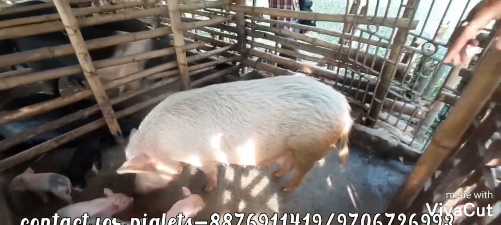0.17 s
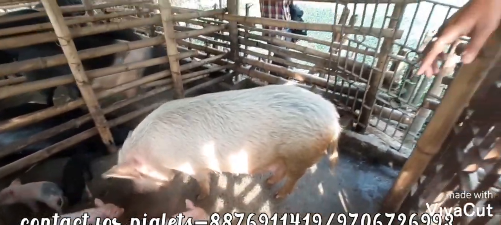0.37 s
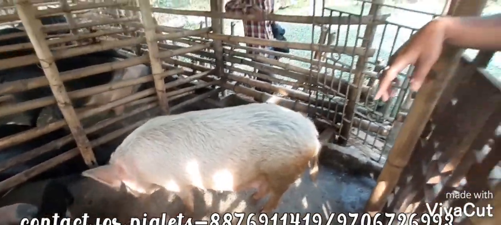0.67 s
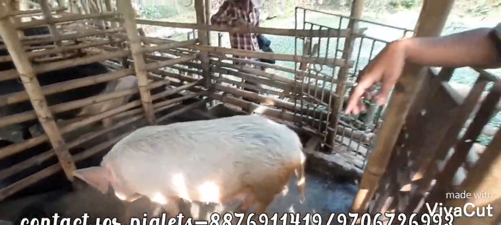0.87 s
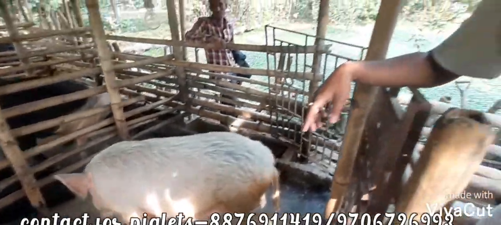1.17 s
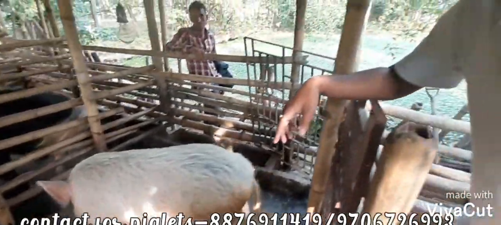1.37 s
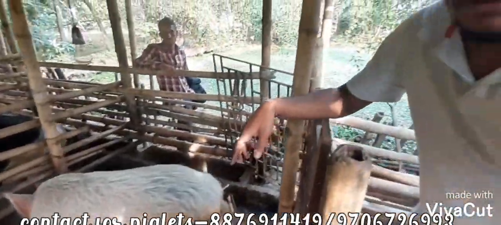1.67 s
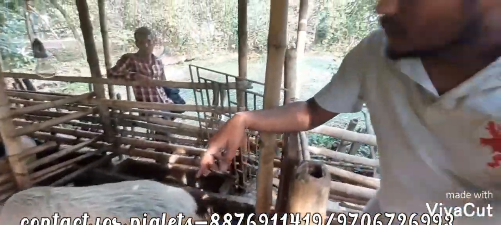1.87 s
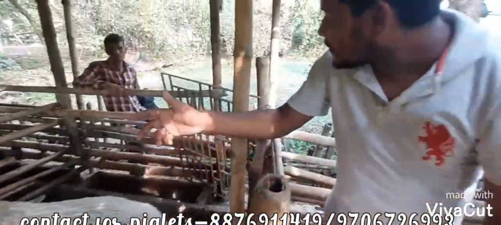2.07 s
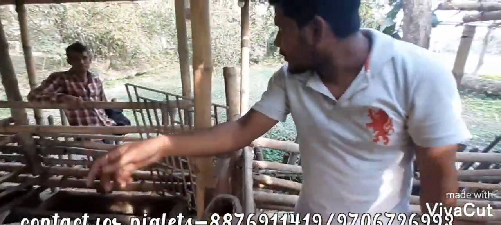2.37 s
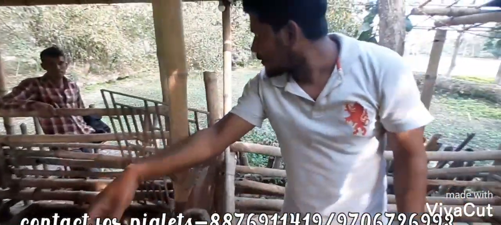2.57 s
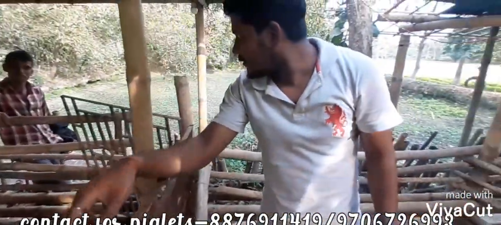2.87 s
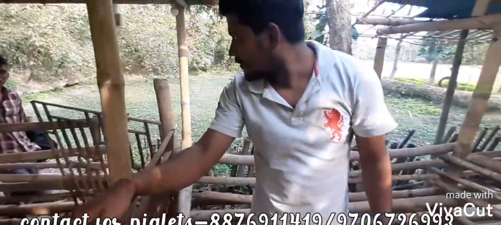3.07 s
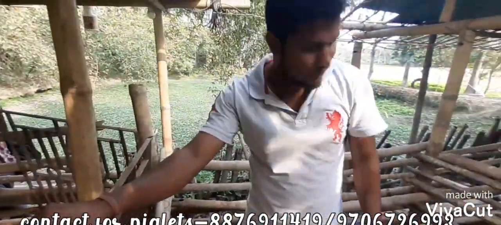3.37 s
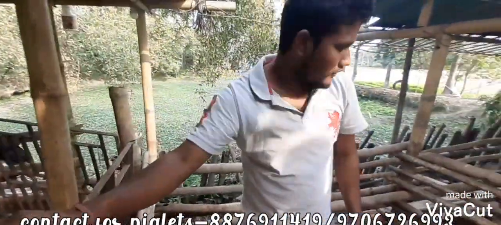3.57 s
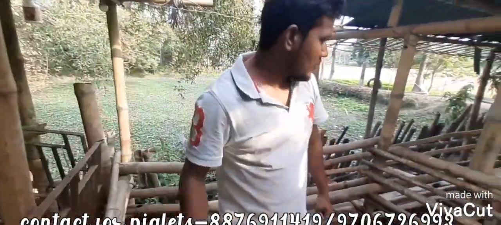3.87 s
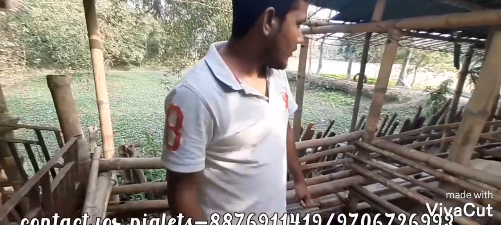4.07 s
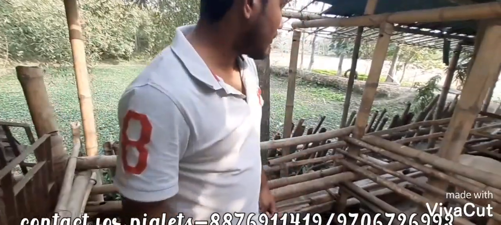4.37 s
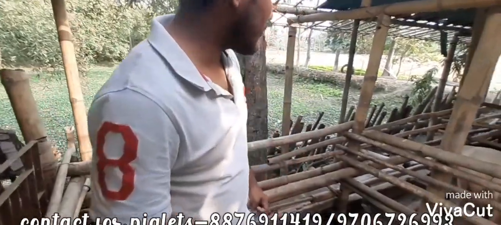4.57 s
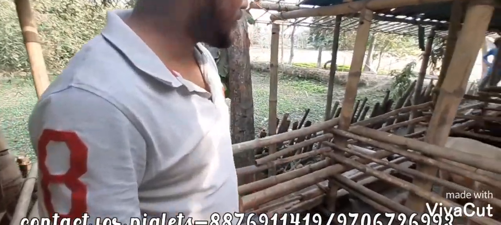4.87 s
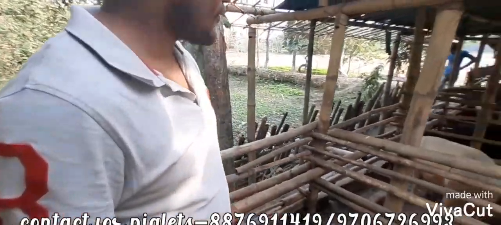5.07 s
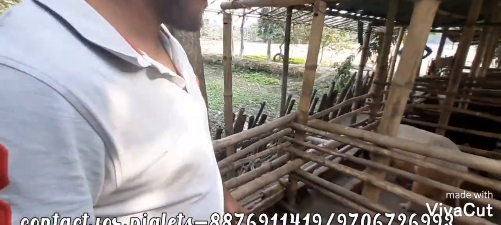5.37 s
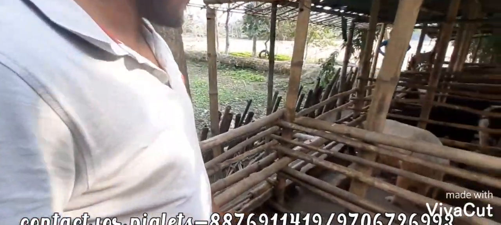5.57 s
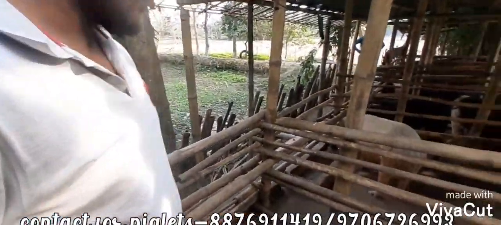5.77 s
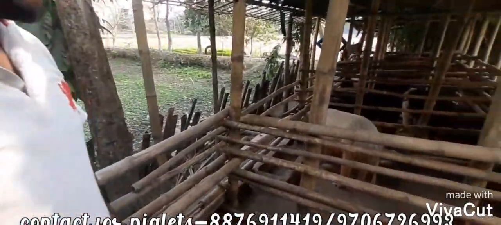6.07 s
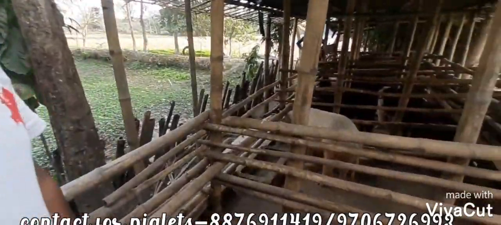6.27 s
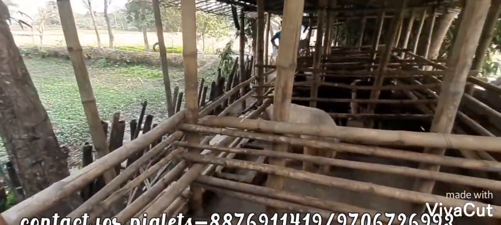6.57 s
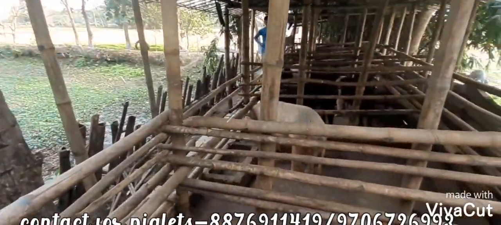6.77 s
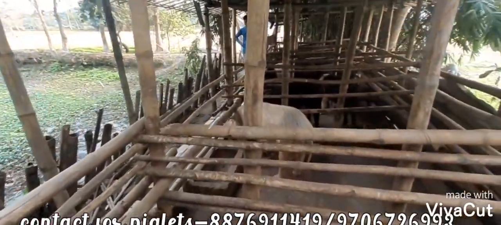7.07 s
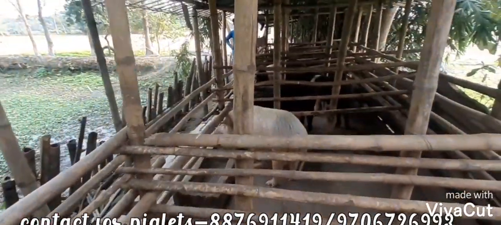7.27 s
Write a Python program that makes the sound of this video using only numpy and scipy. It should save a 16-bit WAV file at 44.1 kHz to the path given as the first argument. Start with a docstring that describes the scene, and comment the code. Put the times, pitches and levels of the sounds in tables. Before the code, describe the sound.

Pigs grunt and snort close by in short irregular runs, with small squeaky oinks early, bird whistles and a distant engine humming then dying away.

```python
"""Bamboo pens under an open roof: pigs grunt, snort, snuffle and oink close to two turning microphones.
A grunt is a short run of slow soft-palate flaps: weak ones thump in the throat, strong ones snap and ring
the snout. Snuffles are fluttering turbulent air; oinks are voiced harmonics shaped by throat and nose.
Small birds whistle gliding tones in the trees around, and a far engine hums as low lines, then winds down.
Outdoor noise lies beneath; knocks are dying scrapes, and brushing clothing is hiss over a low rub."""
import sys
import numpy as np
from scipy import signal
from scipy.fft import rfft, irfft
from scipy.io import wavfile
from scipy.ndimage import uniform_filter1d, map_coordinates

SR = 44100
rng = np.random.default_rng(int(sys.argv[2]) if len(sys.argv) > 2 else 0)


def output_pcm(signal):
    """Save a mono or channel-first signal as 16-bit PCM at the path in sys.argv[1].

    Samples are clipped to [-1, 1] before scaling.
    """
    pcm = np.clip(np.atleast_2d(signal).T, -1, 1) * 32767
    wavfile.write(sys.argv[1], SR, np.round(pcm).astype(np.int16))


N = 327663

TIME = np.arange(N) / SR
FLAP_TIME = np.arange(SR // 14) / SR

# outdoor noise spectrum before normalisation: f/Hz, level per Hz/dB
YARD_SPECTRUM = [(30, 0), (80, 11.5), (270, -5), (2000, -5.5), (4200, -11), (7000, -20), (9000, -14),
                 (15000, -21.5)]
# course of its treble before the overall gain: t/s, level/dB
YARD_TREBLE = [(0.0, -62), (1.59, -62), (2.15, -63.5), (3.37, -66.5), (3.85, -62), (4.3, -64), (5.3, -58.5),
               (5.79, -69.5), (6.31, -62), (7.43, -59.5)]
# engine lines: multiple of the firing rate, level before the fade/dB
ENGINE_LINES = [(2, -56.5), (3, -57.5), (4, -54.5)]
# firing rate before winding down/Hz, start of winding down/s, then its slowing and fading
ENGINE_HZ, ENGINE_STOP_S, ENGINE_SLOWS_OCTAVES_PER_S, ENGINE_FADE_DB_PER_S = 28.2, 3.1, 0.29, 9

# voiced calls: peak t/s, rise/s, fall/s, level/dB, peak f/Hz, fundamental level over the throat/dB,
# pitch jitter/share
OINKS = [(0.172, .02, 0.032, -32.5, 148, -7, .06), (0.51, .025, 0.058, -36.5, 228.8, 1, .09),
         (1.014, .011, .02, -35.5, 172, -13, .03), (2.897, .036, .036, -37.5, 202.6, -3, 0.039)]

# notes of one bird's phrase: t into the phrase/s, length/s, start f/Hz, end f/Hz, level over the phrase/dB
PHRASE_NOTES = [(0, 0.11, 5380, 5060, -5), (.283, 0.077, 3700, 3830, 3.5), (.41, 0.221, 4490, 4340, 2),
                (0.658, 0.21, 2954, 2755, -6.5)]
# its repeats: t/s, level before distance/dB
PHRASE_STARTS = [(0.206, -53), (4.385, -55.5), (6.142, -54)]
# falling slurs: t/s, f from which the shape is scaled/Hz, level before distance/dB
SLURS = [(1.12, 4470, -53.5), (2.16, 4380, -54), (2.52, 4590, -54.5), (3.32, 4450, -53.5),
         (6.745, 4950, -47.5), (7.09, 4250, -50.5)]
SLUR_S, SLUR_SHAPE = 0.11, (0.99, .96, .84, .79)  # length/s; pitches/share of the table f
# arched chirps: t/s, top f/Hz, level before distance/dB
CHIRPS = [(2.095, 3280, -59), (6.344, 4110, -54), (6.924, 4150, -46.5), (7.338, 4124, -44)]
CHIRP_S, CHIRP_START, CHIRP_END = 0.077, .76, .83  # length/s; end pitches/share of the top
# rising sweeps: t/s, level before distance/dB
SWEEPS = [(6.53, -52.5), (7.101, -45)]
SWEEP_S, SWEEP_HZ = .1, (4450, 5080, 6850, 6720)  # length/s; pitches passed through/Hz

# spectrum of blown air: f/Hz, level per Hz/dB
AIR_SPECTRUM = [(60, -6), (200, 14.5), (330, 11.5), (470, 2.5), (700, -2), (2200, 2.5), (4200, -6.5),
                (6700, -15.5), (8800, -11), (15000, -34)]
# air blown between grunts: peak t/s, nominal half length/s, level/dB, mouth f/Hz
SNUFFLES = [ (0.632, 0.063, -43, 580), (1.186, 0.17, -48, 549), (1.493, 0.056, -39, 950),
            (1.576, 0.061, -40, 2000), (1.644, 0.019, -34.5, 4670), (3.071, 0.051, -37.5, 2000),
            (4.017, 0.047, -34.5, 890), (4.647, .056, -35, 715), (6.1, .09, -38, 950),
            (6.355, .05, -42.5, 2300), (6.553, 0.019, -47, 3000), (6.655, 0.014, -41.5, 748),
            (7.318, 0.058, -46, 2220)]

# soft grunts, snout nearly shut: strongest flap t/s, flaps per s, rise/s, fall/s, force level/dB,
# mouth f/Hz, mouth level over the force/dB
SOFT_GRUNTS = [ (1.639, 50, 0.097, 0.069, -40.5, 610, -7.5), (1.802, 48.5, 0.055, 0.029, -43, 586, -13),
               (2.125, 42, 0.061, 0.048, -43, 810, -25), (3.13, 43.5, 0.025, 0.085, -40, 1400, -9),
               (4.125, 42.4, 0.088, 0.04, -39.5, 1020, -13), (5.149, 36.5, .01, 0.019, -35.5, 604, -39),
               (6.231, 32.5, 0.04, 0.063, -34.5, 462, -7.5), (6.849, 32.3, 0.059, 0.12, -38, 580, -28),
               (7.387, 36.7, 0.18, 0.21, -41.5, 826, -17)]
# snorts, snout open: strongest flap t/s, flaps per s, rise/s, fall/s, force level/dB,
# rasp level over the force/dB, snap drop one rise or fall from the peak/dB, closing/octaves per s,
# then the mouth and up to two more cavities, each (f/Hz, level over the force/dB)
SNORTS = [ (2.4276, 39, 0.041, 0.03, -33, 0, 11, .45, (570, -10), (1600, -7.5), (2830, -6)),
          (2.959, 44.7, 0.067, .028, -33.5, -5.5, 21, 0.49, (1400, -3), (890, -6.5), (1900, -10)),
          (3.403, 40.8, 0.048, 0.027, -34, -8.5, 90, .6, (1100, -8.5)),
          (3.954, 42.4, 0.075, .023, -31.5, -1.8, 150, .97, (950, 0.39), (2000, -1)),
          (4.323, 39.5, .027, 0.041, -23.5, -3.5, 11.5, 0.18, (982, -4), (1700, -2), (2710, -9.5)),
          (4.96, 38.7, .05, 0.036, -24, -1.5, 17.7, .3, (951, 5.4), (3400, -7.5), (4120, -8.5)),
          (5.049, 45.5, 0.062, 0.066, -30.5, -5, 17, .5, (1700, -6.5), (2100, -10), (4250, -13.5)),
          (5.476, 37, 0.071, 0.029, -29, 0, 12.8, 0.21, (990, 1), (3600, -3.5)),
          (6.088, 44, .08, .11, -35.5, -3.5, 6, .3, (1050, -10), (2000, -12), (3560, -12.5)),
          (6.599, 31, 0.093, 0.061, -35, -18, 10.6, 2, (1020, -7.5), (1640, -9.5), (1600, -14)),
          (7.154, 42.1, 0.035, 0.037, -35, -13, 6.3, 1, (622, -10), (2060, -9.5))]
# snout resonances before they shift with each flap: f/Hz, width/Hz, level/dB
SNOUT = [(1456, 93, 5.5), (2183, 410, 10.5), (3270, 350, 0.5), (4160, 105, 1), (8750, 2500, -8)]
# soft grunts: rasp over the force/dB, its change per dB of mouth, snap drop/dB, closing/octaves per s
SOFT_RASP_DB, RASP_OPEN_SHARE, SOFT_FOCUS_DB, SOFT_CLOSING = -4.5, 0.33, 11, 1.36
# a firm grunt's force level/dB and throat f/Hz; the throat tightens as the force rises
FIRM_DB, THROAT_HZ, THROAT_DB_PER_OCTAVE = -26.5, 300, 30
SLACK_DB_PER_OCTAVE = 69  # weaker flaps ring lower in the throat
# air blown out as a grunt ends: delay/s, nominal half length/s, level over the rasp/dB
BLOW_DELAY_S, BLOW_S, BLOW_DB = 0.042, .045, -10.5

# knocks and scuffs in the pens: t/s, level/dB, ring f/Hz, t60 of the driving noise/s
KNOCKS = [(1.696, -39, 1590, 0.021), (2.849, -44, 3650, 0.05), (5.631, -36, 3560, .14),
          (7.249, -38.5, 890, 0.088)]
# clothing that brushes past, close by: peak t/s, half length to 1/e/s, hiss level/dB
RUSTLES = [(5.06, 0.3, -52.5), (6.227, 0.042, -41.5)]
# bearing of the pigs as the microphones turn: t/s, lag of the right microphone/ms
BEARING = [(2.5, -0.18), (3.2, 0.36), (5.5, 0.22), (6, -0.3), (7.4, -0.14)]
# imbalance of the microphones: f/Hz, level by which the left is louder/dB
LEAN = [(110, -2), (550, -2), (1000, 1), (3000, -2), (8000, -1)]
EDGE_HZ = 15600  # upper band limit


def amp(db):
    """Decibels to gain."""
    return 10 ** (np.asarray(db) / 20)


def unit(x):
    """Scales to an rms of one."""
    return x / np.sqrt(np.mean(x ** 2) + 1e-20)


def burst(x):
    """Scales a short sound to the energy of 28 ms at an rms of one."""
    return x * np.sqrt(.028 * SR / np.sum(x ** 2))


def read(points, hz):
    """A spectrum table on a log-frequency axis."""
    f, value = np.transpose(points)
    return np.interp(np.log(hz + 1), np.log(f), value)


def curve(points, t):
    """A time table joined by straight lines."""
    return np.interp(t, *np.transpose(points))


def add(mix, s, sound):
    """Mixes a sound in at s seconds."""
    start = round(s * SR)
    part = mix[max(start, 0):][:len(sound)]
    part += sound[:len(part)]


def ring(x, hz, width_hz):
    """One resonance of gain one."""
    return signal.lfilter(*signal.iirpeak(hz, hz / width_hz, SR), x)


def colour(x, points, size=2048):
    """Causal filter with the given spectrum."""
    log_gain = np.log(amp(read(points, abs(np.fft.fftfreq(size, 1 / SR)))))
    taps = np.fft.ifft(np.exp(np.conj(signal.hilbert(log_gain)))).real
    return signal.fftconvolve(x, taps[:size // 2])[:len(x)]


def drift(n, per_s):
    """Slow chance of unit size."""
    knots = rng.standard_normal(int(n / SR * per_s) + 2)
    return np.interp(np.arange(n) / SR * per_s, np.arange(len(knots)), knots)


def yard(pigs, hiss_db=15.0, swell=0.47, swell_s=0.016, quiet_db=-46, alike_hz=450):
    """Diffuse-field coherence: bass noise is alike at both microphones; treble swells with pig power."""
    hz, t, z = signal.stft(rng.standard_normal((3, N)), SR, nperseg=1024)
    alike = 1 / (1 + (hz[:, None] / alike_hz) ** 2)
    z = np.sqrt(alike) * z[0] + np.sqrt(1 - alike) * z[1:]
    z *= amp(read(YARD_SPECTRUM, hz))[:, None]
    z /= np.std(signal.istft(z, SR)[1])
    power = abs(uniform_filter1d(pigs ** 2, int(swell_s * SR))) / amp(quiet_db) ** 2
    level_db = curve(YARD_TREBLE, t)
    usual_db = np.median(level_db)
    swell_db = swell * np.interp(t, TIME, 10 * np.log10(1 + power))
    change_db = level_db - usual_db + swell_db
    treble = np.sqrt(1 - alike)
    return signal.istft(z * amp(hiss_db + usual_db + treble * change_db), SR)[1][:, :N]


def engine(rumble_db=-65, rumble_hz=65):
    """Harmonics of a periodic firing rate: wavering lines in rumble sink and fade as the rate falls."""
    waver = 1 + .004 * drift(N, 12)
    stopping_s = np.maximum(TIME - ENGINE_STOP_S, 0)
    slowing = 2 ** (-ENGINE_SLOWS_OCTAVES_PER_S * stopping_s)
    turns = np.cumsum(ENGINE_HZ * waver * slowing) / SR
    lines = sum(amp(db) * unit(np.sin(2 * np.pi * round(multiple) * turns))
                for multiple, db in ENGINE_LINES)
    noise = rng.standard_normal((2, N))
    rumble = unit(ring(ring(noise, rumble_hz, rumble_hz), rumble_hz, rumble_hz))
    return (lines + amp(rumble_db) * rumble) * amp(-ENGINE_FADE_DB_PER_S * stopping_s)


def oink(s, rise, fall, db, top_hz, chest_db, jitter, arch_octaves=0.15, sag_octaves_per_s=3,
         throat_width_hz=170, nose_hz=1900, nose_db=-11):
    """Source and filter: a sagging, arched pitch drives a throat at the third harmonic and a nasal buzz."""
    t = np.arange(-2 * rise, 2 * fall, 1 / SR)
    swell = np.exp(-(t / np.where(t < 0, rise, fall)) ** 2)
    pitch = top_hz * 2 ** (arch_octaves * (swell - 1) - sag_octaves_per_s * t)
    turns = np.cumsum(pitch * (1 + jitter * drift(len(t), 247.6))) / SR
    folds = sum(np.cos(2 * np.pi * k * turns) for k in range(1, 16))
    throat = ring(ring(folds, 3 * top_hz, throat_width_hz), 3 * top_hz, 3 * top_hz)
    buzz = folds * rng.standard_normal(len(t))
    nose = ring(ring(buzz, nose_hz, nose_hz / 2), nose_hz, nose_hz)
    fundamental = unit(np.sin(2 * np.pi * turns))
    voice = unit(throat) + amp(chest_db) * fundamental + amp(nose_db) * unit(nose)
    return s + t[0], amp(db) * swell * unit(voice)


def oinks():
    """Voiced excitation: piglets give short calls at their tabulated pitches."""
    out = np.zeros(N)
    for row in OINKS:
        add(out, *oink(*row))
    return out


def whistle(length, pitches_hz, waver, flutter_db=3):
    """Frequency modulation: a thin, uneven tone glides through evenly spaced pitches."""
    n = int(length * SR)
    glide = np.interp(np.linspace(0, 1, n), np.linspace(0, 1, len(pitches_hz)), pitches_hz)
    hz = uniform_filter1d(glide, n // 4)
    tone = np.sin(2 * np.pi * np.cumsum(hz * (1 + waver * drift(n, 145.0))) / SR)
    return unit(tone * signal.windows.tukey(n, .5) * amp(flutter_db * drift(n, 54.6)))


def birds(phrase_waver=0.006, call_waver=0.012):
    """Near-sinusoidal whistling: one bird repeats a phrase; others slur, chirp and sweep."""
    out = np.zeros(N)
    for s, db in PHRASE_STARTS:
        for after, length, *pitches, note_db in PHRASE_NOTES:
            add(out, s + after, amp(db + note_db) * whistle(length, pitches, phrase_waver))
    for s, hz, db in SLURS:
        add(out, s, amp(db) * whistle(SLUR_S, hz * np.array(SLUR_SHAPE), call_waver))
    for s, hz, db in CHIRPS:
        arch = hz * np.array([CHIRP_START, 1, CHIRP_END])
        add(out, s, amp(db) * whistle(CHIRP_S, arch, call_waver))
    for s, db in SWEEPS:
        add(out, s, amp(db) * whistle(SWEEP_S, SWEEP_HZ, call_waver))
    return out


def blow(s, length, db, mouth_hz, skew=1.15, flutter_db=4.0, mouth_db=9):
    """Turbulence in a wet snout: fluttering noise excites one mouth resonance."""
    rise, fall = length / skew, length * skew
    t = np.arange(-2 * rise, 2 * fall, 1 / SR)
    flutter = amp(flutter_db * drift(len(t), 225.4))
    air = colour(rng.standard_normal(len(t)) * flutter, AIR_SPECTRUM)
    air += amp(mouth_db) * ring(air, mouth_hz, 70 + 0.094 * mouth_hz)
    swell = np.exp(-(t / np.where(t < 0, rise, fall)) ** 2 * 0.91)
    return s + t[0], amp(db) * unit(air) * swell


def snuffles():
    """Turbulent airflow: pigs blow and root about between grunts."""
    out = np.zeros(N)
    for row in SNUFFLES:
        add(out, *blow(*row))
    return out


def puff():
    """Impulse with decaying turbulence: the palate snaps and a short spurt of air follows."""
    air = .12 * np.exp(-FLAP_TIME / .012) * rng.standard_normal(len(FLAP_TIME))
    air[0] += 1
    return air


def thump(throat_hz, thump_cycles=0.92, chest_hz=130, chest_db=-2):
    """Damped oscillation: the push of one flap rings the throat and moves the chest."""
    cycles = throat_hz * FLAP_TIME
    throat = np.sin(2 * np.pi * cycles) * cycles * np.exp(-cycles / thump_cycles)
    chest = ring(ring(puff(), chest_hz, 2 * chest_hz), 2 * chest_hz, 10 * chest_hz)
    return burst(burst(throat) + amp(chest_db) * burst(chest))


def cavity(hz, ring_s=0.016, sag=0.041, rough=0.03):
    """Impulse response of a cavity: one flap rings it as the falling palate lets its pitch sag."""
    t = FLAP_TIME
    pitch = hz * (1 + sag * (np.exp(-t / ring_s) - .5) + rough * drift(len(t), 350))
    return burst(np.sin(2 * np.pi * np.cumsum(pitch) / SR) * np.exp(-(t / ring_s) ** 2))


def rasp():
    """Parallel resonance: one puff excites the broad snout modes, which shift with each flap."""
    air = puff()
    out = 0
    for hz, width, db in SNOUT:
        shifted_hz = hz * 2 ** (.08 * rng.standard_normal())
        out = out + amp(db) * burst(ring(ring(air, shifted_hz, width), shifted_hz, shifted_hz / 4))
    return burst(out)


def grunt(s, rate, rise, fall, force_db, rasp_db, focus_db, closing, mouth, *cavities,
          wander=0.08, shift_octaves=.06, lead_in_db=-10):
    """Pulsed excitation: flaps swell and fade, thumps outlasting snaps, and blown air follows."""
    out = np.zeros(N)
    mouth_hz, mouth_db = mouth
    throat_hz = THROAT_HZ * 2 ** ((force_db - FIRM_DB) / THROAT_DB_PER_OCTAVE)
    reach = int(rate // 7)  # flaps on either side of the strongest
    for k in range(-reach, reach + 1):
        # the thump is 10 dB down at one rise before the peak and at one fall after it
        away = abs(k) / rate / (rise if k < 0 else fall)
        thump_db, snap_db = -10 * away, -focus_db * away ** 2
        at = s + k / rate + .0003 * np.sqrt(abs(k)) * rng.standard_normal()
        slack = 2 ** (max(thump_db, -20) / SLACK_DB_PER_OCTAVE)
        slack_hz = throat_hz * slack * (1 + wander * rng.standard_normal())
        # all cavities sink as the snout closes; the upper ones also shift from flap to flap
        size = 2 ** (-closing * k / rate)
        shape = size * 2 ** (shift_octaves * (k != 0) * rng.standard_normal())
        rings = sum(amp(db) * cavity(hz * shape) for hz, db in cavities)
        # the mouth already rings faintly in the lead-in
        ring_db = max(snap_db, thump_db + lead_in_db) if k < 0 else snap_db
        add(out, at, amp(force_db + ring_db + mouth_db) * cavity(mouth_hz * size))
        # the thump starts just before the snap
        add(out, at - .002, amp(force_db + thump_db) * thump(slack_hz))
        add(out, at, amp(force_db + snap_db) * (rings + amp(rasp_db) * rasp()))
    add(out, *blow(s + BLOW_DELAY_S, BLOW_S, force_db + rasp_db + BLOW_DB, mouth_hz))
    return out


def grunts():
    """Aperture and resonance: grown pigs grunt with the snout nearly shut or snort with it open."""
    out = np.zeros(N)
    for s, rate, rise, fall, db, mouth_hz, mouth_db in SOFT_GRUNTS:
        rasp_db = SOFT_RASP_DB + RASP_OPEN_SHARE * mouth_db
        mouth = (mouth_hz, mouth_db)
        out += grunt(s, rate, rise, fall, db, rasp_db, SOFT_FOCUS_DB, SOFT_CLOSING, mouth)
    for row in SNORTS:
        out += grunt(*row)
    return out


def knocks(ring_db=0):
    """Decaying noise excitation: each short scrape carries a ring of bamboo."""
    out, t = np.zeros(N), np.arange(SR // 6) / SR
    for s, db, hz, t60 in KNOCKS:
        crack = ring(rng.standard_normal(len(t)) * amp(-60 * t / t60), hz, 2 * hz)
        bamboo = amp(ring_db) * ring(crack, hz, 400)
        add(out, s, amp(db) * burst(colour(crack + bamboo, AIR_SPECTRUM)))
    return out


def rustles(edge_hz=4500, rub_hz=115, rub_db=1):
    """Friction noise: brushing clothing gives soft swells of bright hiss over a low rub."""
    swells = sum(amp(db) * np.exp(-((TIME - s) / length) ** 2) for s, length, db in RUSTLES)
    high_pass = signal.butter(2, edge_hz, "high", fs=SR, output="sos")
    hiss = signal.sosfilt(high_pass, rng.standard_normal((2, N)))
    rub = ring(ring(rng.standard_normal(N), rub_hz, rub_hz), rub_hz, rub_hz)
    return swells * (unit(hiss) + amp(rub_db) * unit(rub))


def echoes(x, t60, gap_s):
    """Diffuse reverberation: dense dying reflections differ at each microphone."""
    t = np.arange(SR // 2) / SR
    tail = rng.standard_normal((2, len(t))) * amp(-60 * t / t60) * (t > gap_s)
    tail /= np.linalg.norm(tail, axis=1, keepdims=True)
    return signal.fftconvolve(x[None], tail, axes=1)[:, :N]


def scene(pen_db=-11, poles_db=-5, bird_db=-4.0, scatter_hz=1300):
    """Arrival-time difference and scattering: pigs arrive with a lag, poles scatter treble, the roof adds a tail."""
    pigs = oinks() + snuffles() + grunts() + knocks()
    lag = curve(BEARING, TIME) * SR / 1000  # in samples
    direct = np.array([map_coordinates(pigs, [np.arange(N) + side * lag / 2]) for side in (1, -1)])
    # long waves pass through the open bamboo, short ones bounce back
    treble = signal.sosfilt(signal.butter(1, scatter_hz, "high", fs=SR, output="sos"), pigs)
    poles = amp(poles_db) * echoes(treble, 0.084, 0.0014)
    roof = amp(pen_db) * echoes(treble, 0.25, 0.012)
    song = birds()
    trees = amp(5) * echoes(song, 0.45, 0.003)
    far = amp(bird_db) * (song / 2 + trees) + engine() + yard(pigs)
    return direct + poles + roof + far + rustles()


def record(dry):
    """Transducer response: two microphones differ in colour, lose deep bass and share an upper band limit."""
    lean_db = read(LEAN, np.fft.rfftfreq(N, 1 / SR))
    heard = irfft(rfft(dry) * amp([lean_db / 2, -lean_db / 2]), N)
    thin = signal.sosfilt(signal.butter(4, 46, "high", fs=SR, output="sos"), heard)
    low_pass = signal.firwin(511, EDGE_HZ, window=("kaiser", 9), fs=SR)
    return signal.oaconvolve(thin, low_pass[None], "same")


dry = scene()
out = record(dry)
output_pcm(out)
```